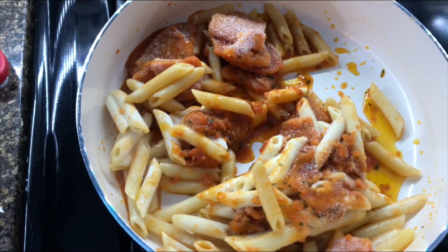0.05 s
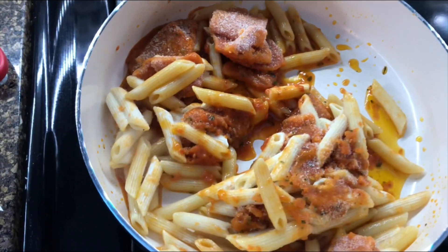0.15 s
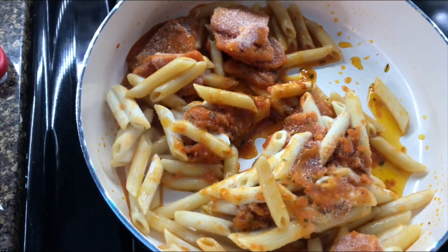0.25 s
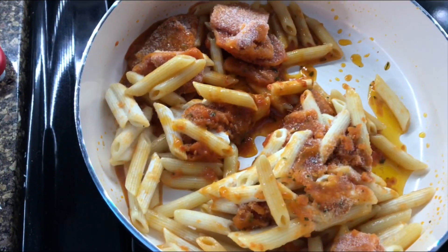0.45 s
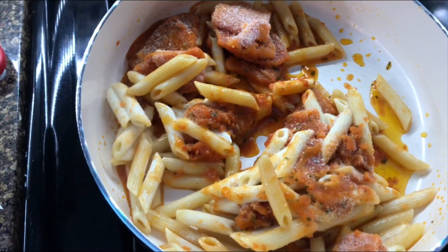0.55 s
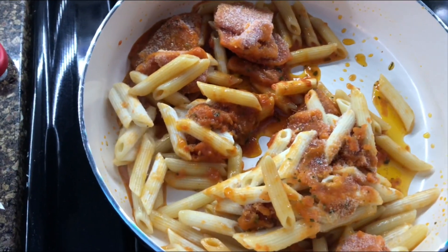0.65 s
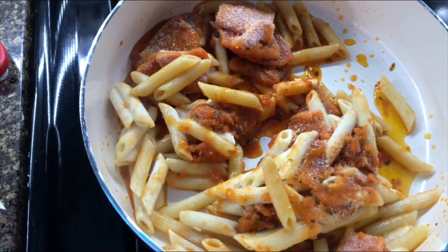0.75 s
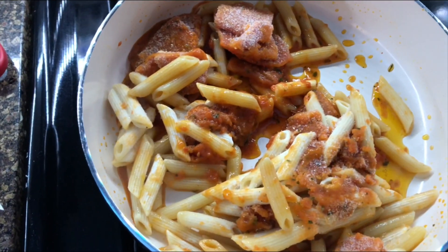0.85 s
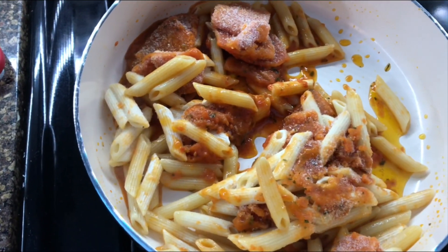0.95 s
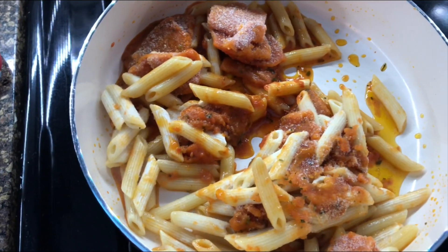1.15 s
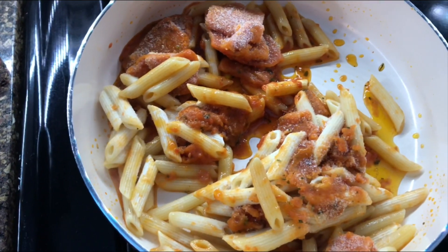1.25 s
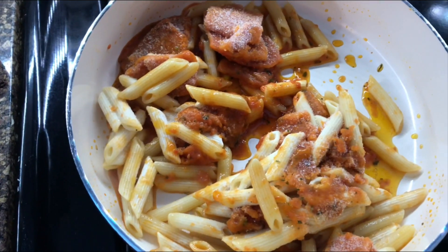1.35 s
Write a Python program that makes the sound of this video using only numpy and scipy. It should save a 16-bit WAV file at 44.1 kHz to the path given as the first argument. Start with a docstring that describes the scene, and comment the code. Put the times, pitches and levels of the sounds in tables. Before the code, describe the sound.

Pasta and meat in sauce sizzle softly in a pan throughout, a close, steady hiss with fine crackles and scattered small pops over a low kitchen rumble. From about 0.1 to 0.4 seconds come dull thuds, with a briefly ringing knock at 0.2 seconds and a faint rebound, like something bumping the stove. The thuds grow faint by 0.6 seconds, and the sizzle continues to about 1.4 seconds.

```python
"""A soft sizzle: pasta and meat in sauce in a pan, heard from just above, over a low rumble. Tiny bubbles burst
and merge into hiss; bigger ones crackle, oil spits, a few pops stand out. Early on come dull thuds and a
ringing knock, then a second, softer knock, as of something bumping the stove. The thuds grow faint; the sizzle
goes on."""
import sys
import numpy as np
from scipy import signal
from scipy.fft import rfft, irfft
from scipy.io import wavfile
from scipy.ndimage import uniform_filter1d

SR = 44100
rng = np.random.default_rng(int(sys.argv[2]) if len(sys.argv) > 2 else 0)


def waveform_to_disk(signal):
    """Save audio, clipped to [-1, 1], as 16-bit WAV at the path in sys.argv[1]."""
    frames = np.transpose(np.atleast_2d(signal))
    scaled = np.clip(frames, -1, 1) * 32767
    samples = np.round(scaled).astype(np.int16)
    wavfile.write(sys.argv[1], SR, samples)


N = 61739
T = np.arange(N) / SR
T_CLICK = T[:SR // 50]

# spectra of sizzle, oil spits, bubble-skin snap: f/Hz, relative level/dB
SIZZLE_SPECTRUM = [(100, -26), (500, -12), (950, -8.5), (1250, 0), (1700, -0.5), (2300, 1.5), (2650, -3),
                   (2950, -6.5), (3500, -8.5), (4200, -5.5), (5000, -10.5), (5900, -5.5), (7700, -13.5),
                   (9200, -12.5), (10500, -18), (11600, -15), (14000, -12), (15700, -17)]
SPIT_SPECTRUM = [(100, -42), (2000, -8), (6000, 3), (9000, -9), (10500, -2), (12000, 10), (14000, 1),
                 (15700, 0)]
SNAP_SPECTRUM = [(100, -35), (700, -3), (1300, -2), (2400, 7.5), (3200, -10), (6000, -11), (9000, -2),
                 (10500, -14), (12000, -3), (15700, -6)]
# bubble size classes: lowest f/Hz, highest f/Hz, rate/(1/s), size spread/dB, level/dB
BUBBLE_CLASSES = [(1074, 3010, 500, 1.5, -64.5), (2940, 6950, 700, 2, -67), (7040, 15500, 580, 3.5, -72.5)]
# spectra of kitchen rumble, opening low ring: f/Hz, relative level/dB
RUMBLE_SPECTRUM = [(15, -29), (30, -2.5), (62, -0.5), (120, -4.5), (200, -14), (300, -12.5), (520, -20.5),
                   (900, -17.5), (2000, -66), (16000, -80)]
LOW_RING_SPECTRUM = [(30, -33), (70, -15), (100, 4.5), (170, -11), (300, -6), (500, -13.5), (770, -11),
                     (1200, -24), (16000, -83)]
# steady hum: f/Hz, level/dB
HUM_TONES = [(750.6, -79), (295.5, -80.5)]
# clear pops: t/s, ring level/dB, f/Hz, decay/s, snap level/dB
CLEAR_POPS = [(0.0487, -52, 5140, 0.00031, -43), (0.1010, -48, 11200, 0.00034, -41.5),
              (0.2135, -47.5, 11000, .0003, -41), (0.3065, -42, 7500, 0.00015, -59),
              (0.3120, -33, 1830, 0.00058, -36), (0.4335, -40, 1990, 0.00038, -63),
              (0.5145, -58.5, 3960, 0.00049, -42), (0.5385, -43, 12700, 0.00034, -54),
              (0.5640, -45, 2000, 0.0014, -55), (0.6315, -44.5, 1320, 0.0013, -44),
              (0.662, -48, 3850, 0.0014, -54), (0.8105, -44, 1700, 0.00093, -37),
              (0.816, -51, 1400, 0.0014, -53), (0.8704, -43, 1500, 0.00052, -54),
              (0.9140, -40.5, 2120, 0.00085, -49), (0.9270, -45.5, 5660, 0.00037, -56),
              (0.9595, -46, 5340, 0.00054, -64), (0.9835, -44.5, 4660, 0.0012, -65),
              (1.0555, -61, 11100, 0.00015, -37.5), (1.0655, -44.5, 1434, 0.0021, -49),
              (1.0715, -41.5, 5500, 0.00041, -40.5), (1.1487, -35, 1940, .0006, -50),
              (1.1563, -52, 1750, 0.00038, -58), (1.1685, -67, 1980, 0.00048, -43),
              (1.33, -47.5, 1400, 0.0016, -52), (1.3430, -54, 11900, 0.00014, -57),
              (1.3880, -43.5, 4000, 0.00067, -66)]
# dull blows: t/s, level/dB, f/Hz, time to peak/s, relative boom level/dB
BLOWS = [(0.141, -30.5, 103.9, 0.022, 4), (0.223, -26.5, 97.5, .019, 0), (0.3043, -26, 81, 0.008, 0),
         (0.345, -36, 88.5, 0.02, -7.5), (0.409, -43, 86.5, 0.011, 0), (0.468, -47.5, 75.7, 0.013, 0.5),
         (0.531, -52.5, 73, 0.024, -17), (0.601, -51, 66.7, 0.015, -9), (0.691, -65, 123, 0.036, -2),
         (0.922, -53, 78, 0.016, 4), (1.15, -58, 110, 0.0096, 0), (1.346, -60, 69.6, 0.016, 5)]
# modes rung by the thuds, panel modes rung by the knock: f/Hz, relative level/dB, t60/s
BOOM_MODES = [(137.9, -8.5, 0.38), (225.4, -12.5, 0.27), (185, -26.5, 0.28), (61.4, -14, 0.3)]
PANEL_MODES = [(279, 5.5, 0.2), (317, 4.5, 0.17), (381.4, 3.5, 0.33), (526.5, 2, 0.15), (589, 0, .09),
               (680, -16, 0.38), (775.8, -16, 0.59), (925, -9, 0.34), (960, -6.5, 0.17), (1100, -13, 0.11),
               (1239, -11.5, 0.21), (1274, -7.5, 0.13), (1400, -7, 0.16), (1556, -12.5, 0.1),
               (1557, -7, 0.18), (2370, -5.5, 0.065)]
# knock and a second, smaller knock: t/s, strength/dB, contact hardness/dB
CONTACTS = [(0.231, 1.5, 4), (0.33, -17, -21)]
# spectra of the knock's clack and rattle: f/Hz, relative level/dB
CLACK_SPECTRUM = [(100, 14.5), (300, 1), (600, -11), (780, 7), (1050, -7), (1600, -24), (1900, -11),
                  (2400, 5.5), (3000, -28), (4200, -12), (5800, -7.5), (8000, -37), (16000, -38)]
RATTLE_SPECTRUM = [(100, -11), (300, -3.5), (700, -9.5), (1100, -7), (1600, -9), (1900, -31), (4200, -17.5),
                   (8000, -74), (16000, -53)]

SNAP_DECAY_S = 0.00052
MAX_SPREADS = 4.5  # cap on random click size


def amp(db):
    """dB to gain."""
    return 10 ** (np.asarray(db) / 20)


def unit_rms(x):
    """Scale to rms 1."""
    return x / np.sqrt(np.mean(x ** 2) + 1e-20)


def coloured(x, spectrum):
    """Filter x by a spectrum table; rms 1."""
    hz, db = np.transpose(spectrum)
    bins_hz = np.fft.rfftfreq(2 * N, 1 / SR)
    gain = amp(np.interp(np.log(bins_hz + 1), np.log(hz), db))
    return unit_rms(irfft(rfft(x, 2 * N) * gain)[:N])


def noise(spectrum):
    """Coloured noise, rms 1."""
    return coloured(rng.standard_normal(N), spectrum)


def drift(samples):
    """Twice-smoothed noise, rms 1."""
    return unit_rms(uniform_filter1d(uniform_filter1d(rng.standard_normal(N), samples), samples))


def decay(t60_s, t=T):
    """Fall of 60 dB per t60_s."""
    return np.exp(-np.log(1000) * t / t60_s)


def rise(tau_s, t=T):
    """Exponential rise from 0 to 1."""
    return 1 - np.exp(-t / tau_s)


def tone(hz):
    """Sine, random phase."""
    return np.sin(2 * np.pi * (hz * T + rng.random()))


def pop_envelope(decay_s, t=T):
    """Fast rise, exponential fall."""
    return rise(0.29 * decay_s, t) * np.exp(-t / decay_s)


def add(mix, start_s, sound):
    """Mix sound in at start_s."""
    part = mix[round(start_s * SR):][:len(sound)]
    part += sound[:len(part)]


def hiss(level_db=-58, patch_db=1.5, flutter_db=0.44):
    """Countless tiny bubbles merge into a patchy, fluttering hiss."""
    cells = signal.stft(rng.standard_normal(N), nperseg=256)[2]
    patches = uniform_filter1d(rng.standard_normal(cells.shape), size=7, axis=0)
    patches = unit_rms(uniform_filter1d(patches, size=6, axis=1))
    wash = signal.istft(cells * amp(patch_db * patches))[1][:N]
    flutter = amp(flutter_db * drift(samples=400))
    return amp(level_db) * coloured(wash * flutter, SIZZLE_SPECTRUM)


def bubble(hz, decay_s, roughness=0.28):
    """One bubble bursts: a very short, rough ring, peak 1."""
    band = signal.butter(1, np.clip([hz / 2, hz * 2], 100, SR * 0.45), "band", fs=SR)
    grit = unit_rms(signal.lfilter(*band, rng.standard_normal(len(T_CLICK))))
    ring = pop_envelope(decay_s, T_CLICK) * (np.sin(2 * np.pi * hz * T_CLICK) + roughness * grit)
    return ring / abs(ring).max()


def crackle(pitches=14, decay_cycles=1.64):
    """Bubbles burst at random: big ones in the sauce, fine ones in the oil."""
    out = np.zeros(N)
    for low_hz, high_hz, per_s, spread_db, db in BUBBLE_CLASSES:
        sizes = amp(spread_db * np.minimum(rng.exponential(1, N), MAX_SPREADS))
        clicks = sizes * (rng.random(N) < per_s / SR) * rng.choice([-1, 1], N)
        pitch_index = rng.integers(0, pitches, N)
        layer = np.zeros(N)
        for k, hz in enumerate(np.geomspace(low_hz, high_hz, pitches)):
            layer += signal.oaconvolve(clicks * (pitch_index == k), bubble(hz, decay_cycles / hz))[:N]
        out += amp(db) * coloured(layer, SIZZLE_SPECTRUM)
    return out


def spits(level_db=-71, per_s=340, spread_db=3, clump_db=3.5, shapes=12):
    """Oil spits tiny wideband clicks; their level drifts in loose clumps."""
    sizes_db = spread_db * np.minimum(rng.exponential(1, N), MAX_SPREADS)
    sizes_db += clump_db * drift(samples=600)
    clicks = amp(sizes_db) * (rng.random(N) < per_s / SR)
    shape_index = rng.integers(0, shapes, N)
    spray = np.zeros(N)
    for k in range(shapes):
        spit = rng.standard_normal(len(T_CLICK)) * np.exp(-T_CLICK / SNAP_DECAY_S)
        spray += signal.oaconvolve(clicks * (shape_index == k), spit)[:N]
    return amp(level_db) * coloured(spray, SPIT_SPECTRUM)


def background(rumble_db=-62, swell_db=1, ring_db=-56, fade_s=0.1):
    """Uneven kitchen rumble, faint hum, and a low ring that dies away at the start."""
    rumble = amp(rumble_db + swell_db * drift(samples=3000)) * noise(RUMBLE_SPECTRUM)
    hum = sum(amp(db) * unit_rms(tone(hz)) for hz, db in HUM_TONES)
    low_ring = amp(ring_db) * np.exp(-(T / fade_s) ** 2) * noise(LOW_RING_SPECTRUM)
    return rumble + hum + low_ring


def pops():
    """The few bubbles that stand out: the skin snaps, the cavity rings."""
    out = np.zeros(N)
    for start_s, ring_db, hz, decay_s, snap_db in CLEAR_POPS:
        add(out, start_s, amp(ring_db) * bubble(hz, decay_s))
        add(out, start_s, amp(snap_db) * pop_envelope(SNAP_DECAY_S) * noise(SNAP_SPECTRUM))
    return out


def thuds(boom_rise_s=0.014, sharpness=1.74):
    """Soft blows swell and fade in a few cycles and leave a low boom."""
    out = np.zeros(N)
    modes = sum(amp(db) * decay(t60_s) * np.sin(2 * np.pi * hz * T) for hz, db, t60_s in BOOM_MODES)
    boom = rise(boom_rise_s) * modes
    for start_s, db, hz, peak_s, boom_db in BLOWS:
        envelope = (T / peak_s * np.exp(1 - T / peak_s)) ** sharpness
        push = -envelope * np.sin(2 * np.pi * hz * T)
        add(out, start_s, amp(db) * (push + amp(boom_db) * boom))
    return out


def knock(ring_db=-41, clack_db=-40.5, rattle_db=-46.5, rise_cycles=7.8, hold_s=0.0029):
    """Hard contacts clack, rattle briefly and ring the panels; low modes swell later."""
    out = np.zeros(N)
    clack_envelope = rise(tau_s=0.0015) * decay(t60_s=0.013, t=np.maximum(T - hold_s, 0))
    for start_s, strength_db, hardness_db in CONTACTS:
        ring = sum(amp(ring_db + db) * rise(rise_cycles / hz) * decay(t60_s) * tone(hz)
                   for hz, db, t60_s in PANEL_MODES)
        clack = amp(clack_db + hardness_db) * clack_envelope * noise(CLACK_SPECTRUM)
        rattle = amp(rattle_db) * decay(t60_s=0.34) * noise(RATTLE_SPECTRUM)
        add(out, start_s, amp(strength_db) * (ring + clack + rattle))
    return out


def reverb(x, tail_db=-6.5, t60_s=0.22):
    """Pan wall and room add a short diffuse tail."""
    tail = rng.standard_normal(N) * decay(t60_s)
    return x + amp(tail_db) * signal.fftconvolve(x, tail / np.linalg.norm(tail))[:N]


def scene():
    """Sizzle, bumps and background; mono."""
    sizzle = hiss() + reverb(crackle() + spits() + pops())
    return (sizzle + thuds() + knock() + background())[None]


def record(dry):
    """Low cut and band limit."""
    low_cut_hz, top_hz = 55, 15750
    highpass = signal.butter(2, low_cut_hz, "high", fs=SR, output="sos")
    lowpass = signal.firwin(701, top_hz, window=("kaiser", 9), fs=SR)
    return signal.oaconvolve(signal.sosfilt(highpass, dry), lowpass[None], "same")


dry = scene()
out = record(dry)
waveform_to_disk(out)
```